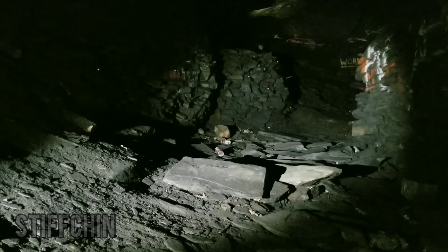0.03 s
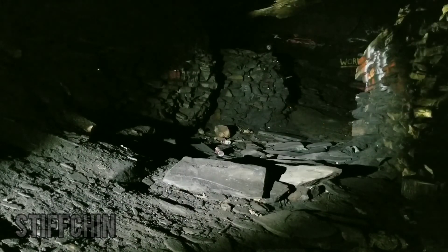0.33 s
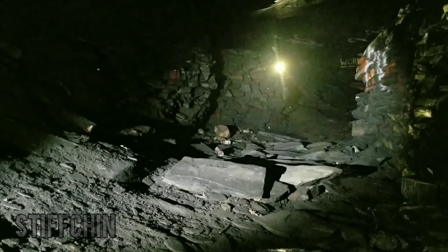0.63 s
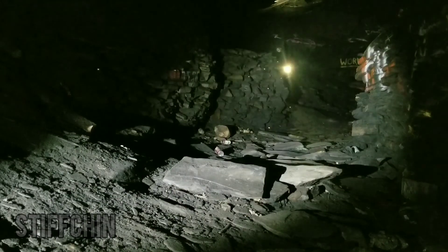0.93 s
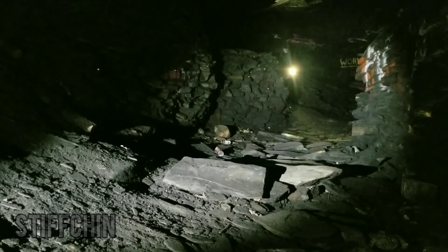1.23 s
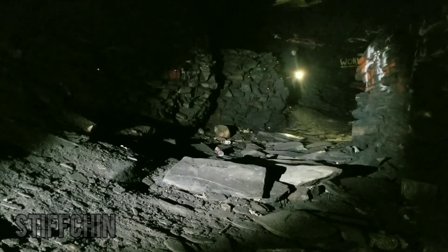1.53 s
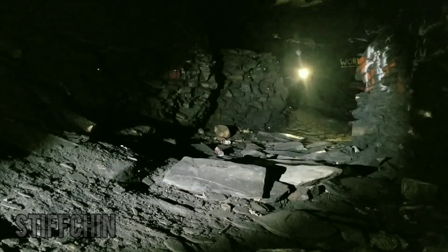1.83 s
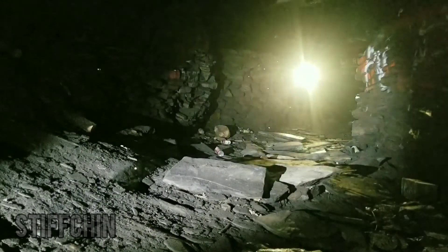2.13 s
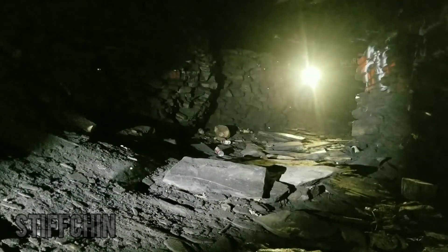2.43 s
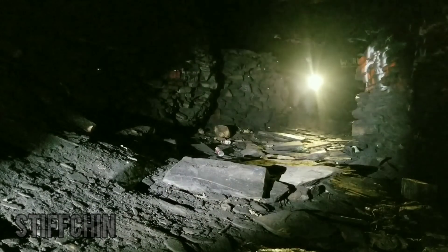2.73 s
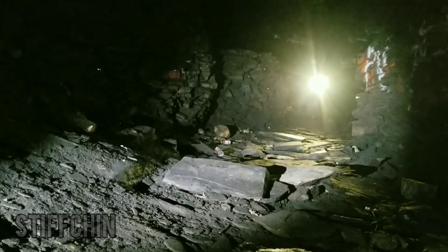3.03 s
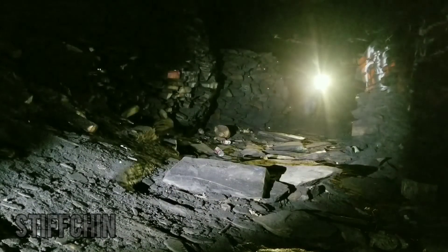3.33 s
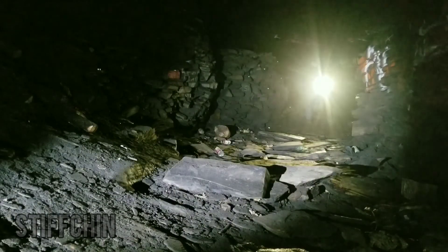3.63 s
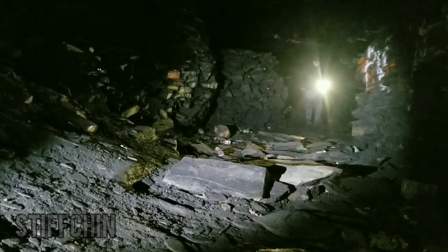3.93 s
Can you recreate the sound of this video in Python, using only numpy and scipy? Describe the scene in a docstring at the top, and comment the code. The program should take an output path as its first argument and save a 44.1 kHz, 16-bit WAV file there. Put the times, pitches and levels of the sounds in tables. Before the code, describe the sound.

A low, distant engine-like drone sinks in pitch in a quiet cave, with faint footsteps.

```python
"""A quiet rock cave. Low rumble, diffuse air noise and a thin steady hiss form the background.
Someone moves about: cloth rustles and soles scuff by friction, weight rolls onto the floor
in soft thuds, and a loose slab knocks once underfoot. A distant engine-like drone of two tones
sinks in pitch and swells unevenly; its faint overtones catch a cave resonance."""
import sys
import numpy as np
from scipy import signal
from scipy.fft import rfft, irfft
from scipy.io import wavfile

SR = 44100
rng = np.random.default_rng(int(sys.argv[2]) if len(sys.argv) > 2 else 0)


def output_pcm(signal):
    """Save a mono or channel-first signal as 16-bit PCM at the path in sys.argv[1].

    Samples are clipped to [-1, 1] before scaling.
    """
    pcm = np.clip(np.atleast_2d(signal).T, -1, 1) * 32767
    wavfile.write(sys.argv[1], SR, np.round(pcm).astype(np.int16))


N = 176400  # 4 s


def undb(db):
    """Decibels to gain."""
    return 10 ** (np.asarray(db) / 20)


def unit(x):
    """Scale to rms 1."""
    return x / np.sqrt(np.mean(x ** 2))


def times():
    """Sample times in s."""
    return np.arange(N) / SR


def freqs():
    """Bin frequencies in Hz, floored at 1."""
    return np.maximum(np.arange(N // 2 + 1) * SR / N, 1)


def track(table):
    """One per-sample curve for each column after time_s."""
    time_s, *columns = np.array(table).T
    return [np.interp(times(), time_s, column) for column in columns]


def walk(rate_hz):
    """Smooth random drift, rms 1."""
    spectrum = rfft(rng.standard_normal(N))
    return unit(irfft(spectrum / (1 + (2 * freqs() / rate_hz) ** 4), N))


def colour(points):
    """Gain per bin from (freq_hz, gain_db) points."""
    freq_hz, gain_db = np.array(points).T
    return undb(np.interp(np.log(freqs()), np.log(freq_hz), gain_db))


def stereo(mid, side, side_db):
    """Mid and side to left and right."""
    return mid + undb(side_db) * side * np.array([[1], [-1]])


def noise(bin_gain, side_db):
    """Coloured stereo noise, rms 1."""
    mid, side = irfft(rfft(rng.standard_normal((2, N))) * bin_gain, N)
    return unit(stereo(mid, side, side_db))


def pan(pan_db):
    """Constant-power gains; positive is left."""
    return unit(undb(np.array([[pan_db], [-pan_db]]) / 2))


def envelope(start_s, attack_s, hold_s, decay_s):
    """Linear rise, hold, exponential fall."""
    age_s = times() - start_s
    rise = np.clip(age_s / attack_s, 0, 1)
    return rise * np.exp(-np.maximum(age_s - attack_s - hold_s, 0) / decay_s)


# Hiss spectrum: freq_hz, relative_db
HISS_SPECTRUM = [(5000, -22.5), (8500, -14), (10000, -4.5), (12000, 2.5), (14000, 2), (15800, 1)]

def hiss(level_db=-75, drift_db=0.2):
    """Thin, near-steady microphone hiss."""
    gain = undb(level_db + drift_db * walk(rate_hz=3.6))
    return noise(colour(HISS_SPECTRUM), side_db=0.2) * gain * pan(pan_db=1.5)


# Air spectrum: freq_hz, relative_db
AIR_SPECTRUM = [(100, 2.5), (250, 3.5), (500, -3), (1000, -5.5), (2000, -8), (2750, -8), (4000, -14.5),
                (6500, -18), (8500, -24.5), (11000, -19.5)]

def air(level_db=-74, drift_db=0.3):
    """Diffuse air noise of the cave."""
    gain = undb(level_db + drift_db * walk(rate_hz=11))
    return noise(colour(AIR_SPECTRUM), side_db=0.5) * gain * pan(pan_db=2)


# Rumble spectrum: freq_hz, relative_db
RUMBLE_SPECTRUM = [(20, -19), (35, -11.5), (55, -7), (68, -5.5), (88, 7), (112, 0), (135, -6.5),
                   (160, -6.5), (180, -8.5), (240, -22.5), (400, -32), (800, -42.5), (1600, -61)]
# Rumble contour: time_s, level_db
RUMBLE_CONTOUR = [(0, -58), (.6, -60.5), (1.3, -55.5), (2.4, -54.5), (3.0, -57), (3.5, -53), (4.0, -58.5)]

def rumble(drift_db=2):
    """Low noise, its level drifting about a slow contour."""
    [level_db] = track(RUMBLE_CONTOUR)
    bed = noise(colour(RUMBLE_SPECTRUM), side_db=-12.5)
    return bed * undb(level_db + drift_db * walk(rate_hz=4.3))


def friction(strokes, attack_s, decay_s, grit_db=1.5):
    """Noise bands broken up by tiny catches and slips."""
    grit = undb(grit_db * walk(rate_hz=300))
    out = 0
    for start_s, hold_s, level_db, centre_hz, width_hz, pan_db in strokes:
        band = 1 / np.sqrt(1 + (2 * (freqs() - centre_hz) / width_hz) ** 6)
        rub = unit(noise(band, side_db=0) * grit)
        out += rub * undb(level_db) * pan(pan_db) * envelope(start_s, attack_s, hold_s, decay_s)
    return out


# Cloth strokes: start_s, hold_s, level_db, centre_hz, width_hz, pan_db
CLOTH_STROKES = [(.03, 0.06, -79, 12300, 5000, 3), (.88, 0.13, -81, 12200, 3980, -6),
                 (1.23, 0.075, -77, 11300, 6060, 2), (1.54, 0.089, -79, 11100, 4999, 2),
                 (1.94, 0.33, -77.5, 11520, 5900, 3.5), (2.8, 0.13, -77, 12200, 5975, -1),
                 (3.47, 0.39, -78, 12430, 5500, 2), (3.58, 0.11, -81, 4954, 6092, 12)]

def cloth():
    """Cloth rubs in soft, high rustles."""
    return friction(CLOTH_STROKES, attack_s=0.043, decay_s=0.06)


# Sole strokes: start_s, hold_s, level_db, centre_hz, width_hz, pan_db
SOLE_STROKES = [(.45, .01, -88, 8100, 1500, 10), (.608, 0.028, -81.5, 8700, 1900, 8),
                (1.133, 0.021, -69, 12500, 6000, 7), (1.135, 0.018, -70, 10700, 1402, 1),
                (1.238, 0.024, -72, 12070, 5960, 4), (1.345, 0.037, -83, 7500, 1100, 17),
                (1.40, 0.087, -86, 6587, 2180, 11), (1.63, .035, -72.5, 13500, 5000, 4),
                (1.632, 0.021, -82.5, 5485, 2360, 7), (1.745, 0.044, -82, 7050, 1604, 11),
                (1.754, 0.013, -64, 8325, 2160, 10), (1.757, 0.024, -65, 11800, 6140, 2),
                (2.21, 0.018, -75, 11300, 6000, 4), (2.28, 0.037, -79.5, 8900, 3300, 11),
                (2.53, .03, -76.5, 11670, 6000, 3.5), (2.905, 0.024, -77, 6110, 1508, 13),
                (2.912, 0.05, -78, 12010, 7000, 9), (3.53, 0.046, -76.5, 1996, 2400, 5),
                (3.822, 0.028, -74.5, 8780, 2000, 7)]

def scuffs():
    """Soles scrape the floor in short, gritty strokes."""
    return friction(SOLE_STROKES, attack_s=0.009, decay_s=0.037)


# Slab modes, before squaring: freq_hz, width_hz, relative_db
SLAB_RESONANCES = [(480, 41, -0.5), (510, 40, -2), (548, 43, -3), (587, 51, -1), (666, 50, -7)]

def slab(level_db=-68.5):
    """A loose slab rocks underfoot: one short, hollow knock."""
    response = sum(undb(relative_db) / (1 + 2j * (freqs() - freq_hz) / width_hz)
                   for freq_hz, width_hz, relative_db in SLAB_RESONANCES)
    ring = noise(abs(response) ** 2, side_db=-1.5)
    return ring * undb(level_db) * envelope(start_s=1.226, attack_s=0.022, hold_s=0.027, decay_s=0.033)


# Thud spectrum, before each step's low-pass: freq_hz, relative_db
THUD_SPECTRUM = [(25, -9.5), (50, -1), (120, 0), (220, 2), (290, -4), (350, -2), (430, -11.5), (600, -11),
                 (1000, -16), (3000, -17)]
# Footfalls: start_s, hold_s, level_db, cutoff_hz
FOOTFALLS = [(0.0, 0.053, -64.5, 395), (0.084, 0.056, -60.5, 295), (0.71, 0.088, -73, 300),
             (1.208, 0.15, -62, 263), (2.032, 0.04, -62, 322), (2.108, 0.061, -59, 284),
             (2.777, 0.079, -62, 437.6), (2.892, .05, -61.5, 368.6), (3.411, .04, -70.5, 437.6),
             (3.532, 0.054, -64, 260.5)]

def footfalls(attack_s=0.0067, decay_s=0.034):
    """Weight rolls onto the floor in soft, dull thuds."""
    out = 0
    for start_s, hold_s, level_db, cutoff_hz in FOOTFALLS:
        lowpass = 1 / np.sqrt(1 + (freqs() / cutoff_hz) ** 3.76)
        thud = noise(colour(THUD_SPECTRUM) * lowpass, side_db=-9.5)
        out += thud * undb(level_db) * envelope(start_s, attack_s, hold_s, decay_s)
    return out


def tone(pitch_hz):
    """Gliding sine, rms 1; reflections make it differ slightly between the ears."""
    phase = 2 * np.pi * (np.cumsum(pitch_hz) / SR + rng.random())
    reflections = walk(rate_hz=2.7) * np.sin(phase) + walk(rate_hz=11) * np.cos(phase)
    return stereo(np.sqrt(2) * np.sin(phase), reflections, side_db=-23)


# Lower tone: time_s, pitch_hz, level_db
DRONE_LOWER = [(0,97.5,-46.5),(.09,98.7,-45),(.2,98,-58),(.31,97.5,-50.5),(.43,95.95,-46.5),(.52,94.7,-61),(.62,93.9,-54.5),(.83,92.23,-45.5),(.93,91.6,-59),(1.0,91.85,-50.5),(1.26,90.6,-43.5),(1.39,88.57,-57),(1.57,87.54,-45.5),(1.69,86.8,-56.5),(1.84,84.5,-43.5),(2.04,84.8,-45),(2.13,79.65,-56.5),(2.19,80.36,-43),(2.33,77.8,-56.5),(2.5,73.88,-60.5),(3.0,70.9,-64.5),(3.3,68.4,-54),(3.6,62,-64),(4.0,51.42,-72)]
# Upper tone, before trim: time_s, pitch_hz, level_db
DRONE_UPPER = [(0,157.5,-81),(.4,152.5,-65),(.6,149.4,-74),(.9,147,-57.5),(1.8,138.3,-59.5),(2.1,131.5,-60.5),(2.3,120.4,-60),(2.42,116.5,-47.5),(2.65,114.5,-57),(2.82,113.5,-52),(3.0,112.5,-66),(3.14,111.2,-46),(3.22,110.1,-53.5),(3.37,107.4,-39),(3.44,104.4,-54),(3.66,93.5,-48),(3.87,86.6,-67),(4.0,78.9,-49)]
# Overtones of the lower tone, at resonance: pitch_ratio, level_db
DRONE_OVERTONES = [(2.0, -69), (2.18, -68.5), (2.58, -72.5)]

def drone(upper_trim_db=-1, waver_db=4.5, cave_mode_hz=179.3, mode_width_hz=28):
    """Two sinking, swelling tones; wavering overtones swell as they sink through a cave resonance."""
    lower_hz, lower_db = track(DRONE_LOWER)
    upper_hz, upper_db = track(DRONE_UPPER)
    out = tone(lower_hz) * undb(lower_db)
    out += tone(upper_hz) * undb(upper_db + upper_trim_db)
    for pitch_ratio, level_db in DRONE_OVERTONES:
        pitch_hz = pitch_ratio * lower_hz
        resonance = 1 / np.hypot(1, 2 * (pitch_hz - cave_mode_hz) / mode_width_hz)
        out += tone(pitch_hz) * resonance * undb(level_db + waver_db * walk(rate_hz=4.4))
    return out


def scene():
    """Cave background, quiet movement and the drone."""
    background = hiss() + air() + rumble()
    movement = cloth() + scuffs() + slab() + footfalls()
    return background + movement + drone()


def record(dry, cutoff_hz=15900):
    """Steep elliptic low-pass."""
    return signal.sosfilt(signal.ellip(12, 0.1, 70, cutoff_hz, fs=SR, output="sos"), dry)


dry = scene()
out = record(dry)
output_pcm(out)
```